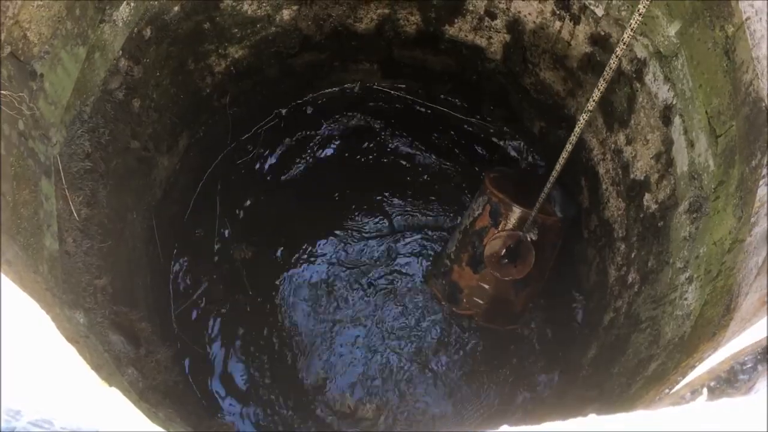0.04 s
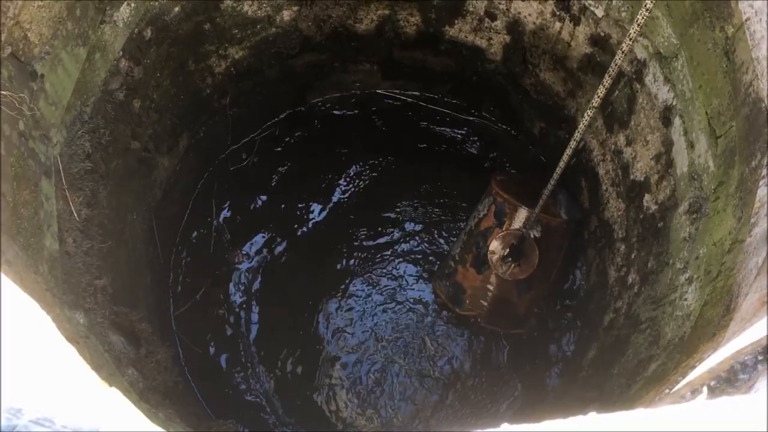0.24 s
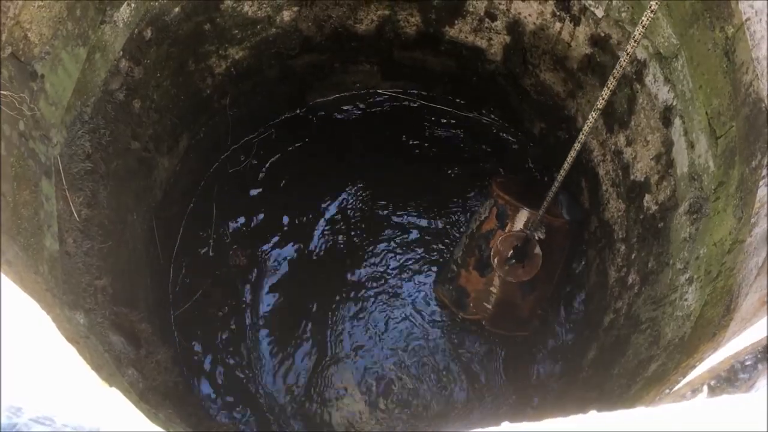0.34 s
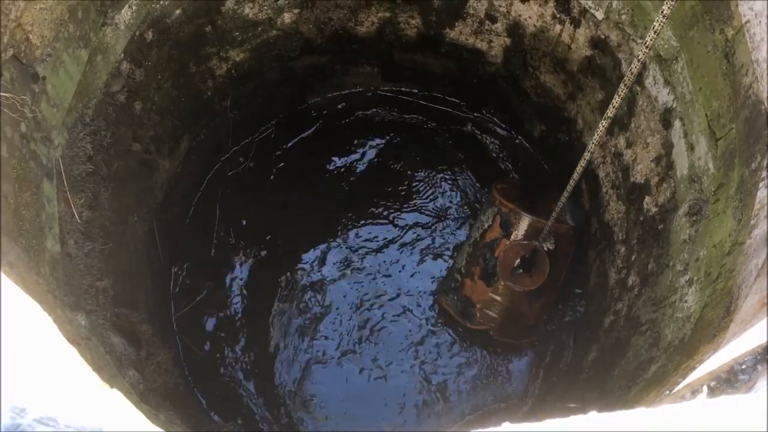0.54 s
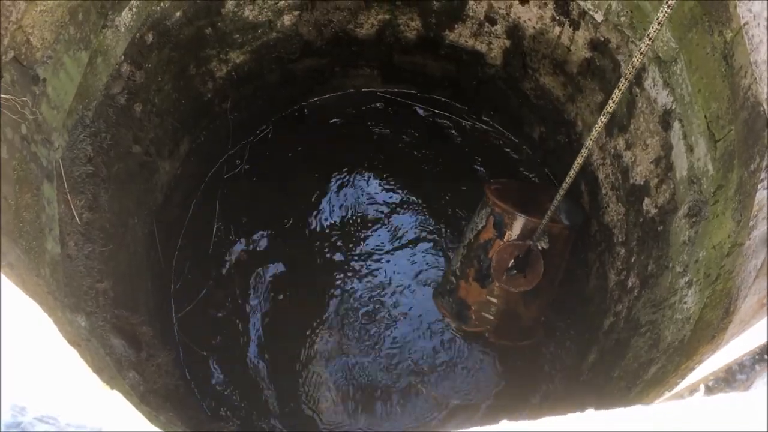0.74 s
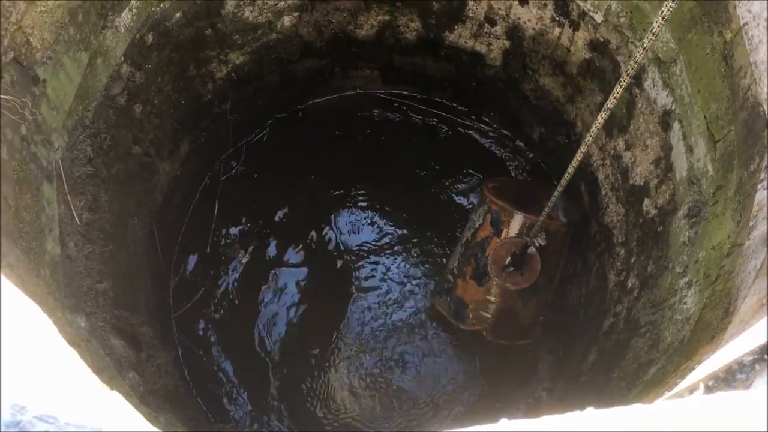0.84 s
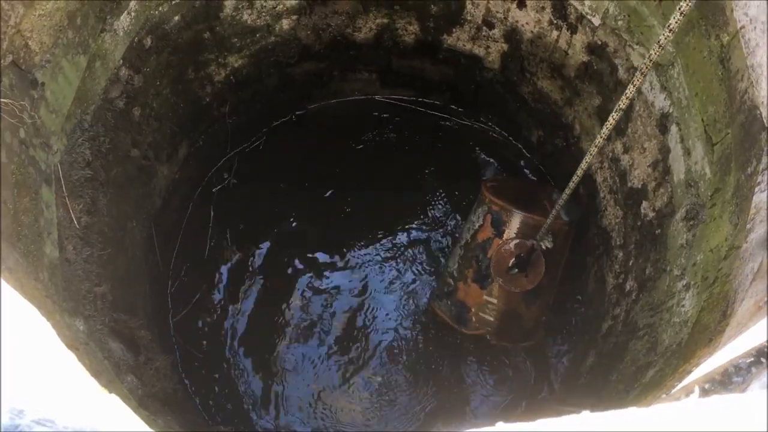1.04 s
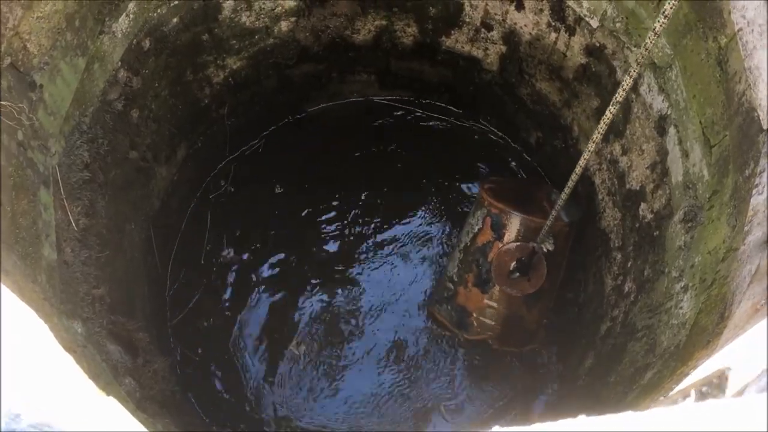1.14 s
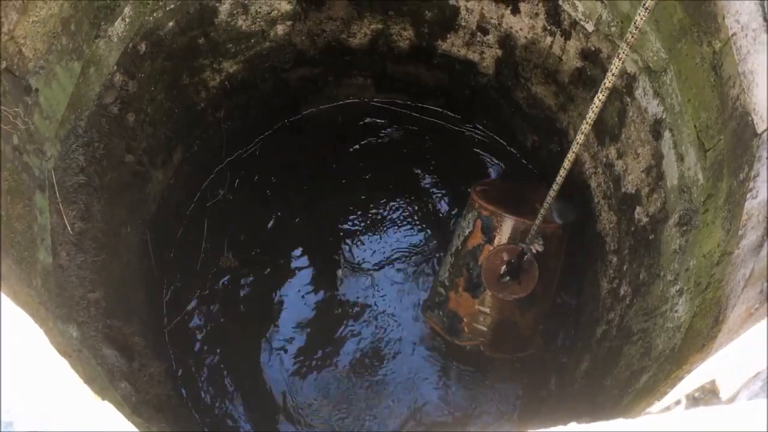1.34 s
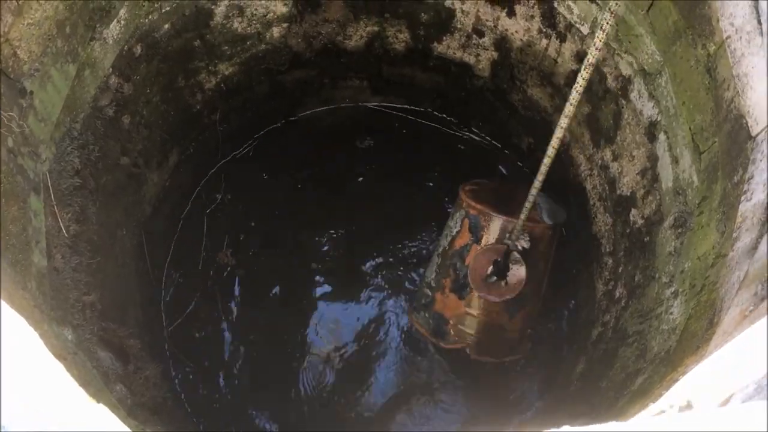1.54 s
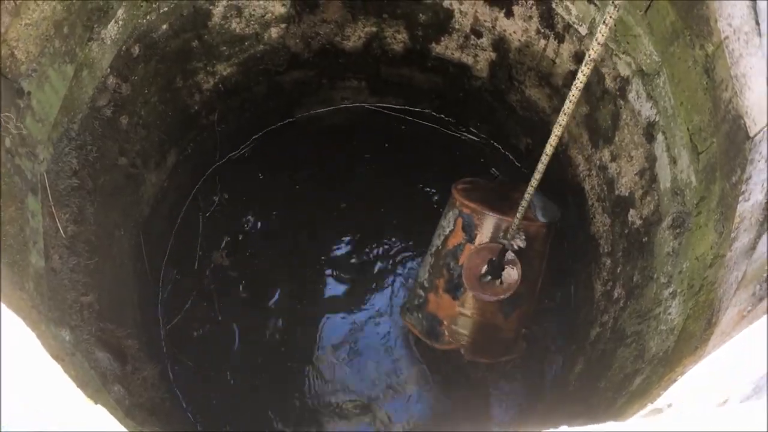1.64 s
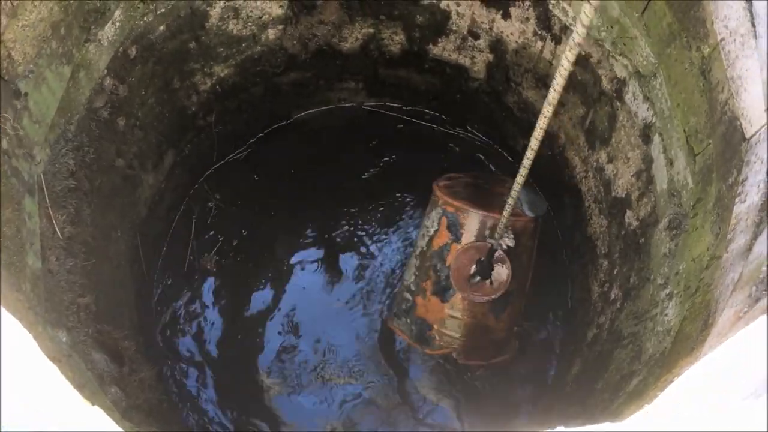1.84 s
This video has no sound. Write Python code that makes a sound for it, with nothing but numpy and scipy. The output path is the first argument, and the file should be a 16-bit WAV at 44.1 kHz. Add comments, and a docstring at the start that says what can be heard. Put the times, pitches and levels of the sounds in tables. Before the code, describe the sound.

A metal pump thuds once against a well wall, over low rumble and faint drips.

```python
"""A soft outdoor hush lies over a stone well, where stirred water ripples and splashes faintly.
Almost at once, turbulent puffs of air begin to rumble on the microphone. At 0.29 s a metal pump
hanging on a rope bumps the wall: a short gritty contact, then a dull boom as the modes of the
shaft ring and decay. From 0.7 s drips fall, each a resonating bubble that echoes off the stone,
while the lapping and the puffs go on."""
import sys
import numpy as np
from scipy import signal
from scipy.io import wavfile
from scipy.ndimage import uniform_filter1d

SR = 44100
rng = np.random.default_rng(int(sys.argv[2]) if len(sys.argv) > 2 else 0)


def store_pcm(level_fs):
    """Save levels as 16-bit WAV."""
    pcm = np.round(np.clip(level_fs, -1, 1) * 32767).astype(np.int16)
    wavfile.write(sys.argv[1], SR, np.atleast_2d(pcm).T)


N = 83790
TIME = np.arange(N) / SR

# outdoor hush: frequency_hz, half_octave_level_db
HUSH_SPECTRUM = [(300, -74), (600, -67), (830, -63), (1120, -52), (1550, -53), (1850, -58.5), (2300, -70.5),
                 (3200, -76), (6000, -93)]
# its slow swell: time_s, gain_db
HUSH_SWELL = [(0, 1.5), (.25, 0), (.5, -2), (.8, -3.5), (1.0, -1), (1.35, 2), (1.7, 4.5), (1.9, 4.5)]
# air in the shaft: frequency_hz, half_octave_level_db
SHAFT_AIR_SPECTRUM = [(100, -57), (210, -64.5), (300, -65), (410, -65.5), (600, -66), (900, -67.5)]
# hiss of rippling water: frequency_hz, half_octave_level_db
RIPPLE_SPECTRUM = [(1800, -61), (2800, -67.5), (4000, -66), (5800, -65.5), (7500, -66), (9000, -63),
                   (10400, -67), (12000, -66.5), (15500, -69)]
# its slow swell: time_s, gain_db
RIPPLE_SWELL = [(0, 1), (.12, -1), (.25, -2.5), (.5, -5.5), (.65, -8.5), (.83, -5.5), (.93, -5),
                (1.02, -3.5), (1.17, 2), (1.33, 3.5), (1.47, 0), (1.59, -4), (1.73, 2), (1.9, 1.5)]
# small splashes: start_s, level_db, centre_hz, t60_s
SPLASH_BURSTS = [(.005, -55.5, 3330, 0.1), (.473, -56.5, 9000, 0.025), (.495, -60, 13400, 0.045),
                 (0.894, -58, 7940, 0.11), (0.965, -54, 11400, .04), (1.146, -47, 4300, 0.11),
                 (1.146, -51, 9300, 0.18), (1.187, -49.5, 9000, 0.11), (1.27, -52, 12000, 0.083),
                 (1.465, -54, 2000, 0.1), (1.633, -53, 13000, .05), (1.71, -52.5, 10500, 0.12),
                 (1.818, -43, 8800, 0.13), (1.821, -51.5, 4340, .15)]
# puffs of air: start_s, length_s, level_db
AIR_PUFFS = [(0.017, 0.098, -40), (0.159, 0.11, -28.5), (0.308, 0.065, -38.5), (0.493, 0.059, -42.5),
             (0.631, 0.028, -35), (0.672, 0.031, -34), (0.95, 0.051, -40.5), (1.138, 0.12, -37.5),
             (1.353, 0.027, -33.5), (1.422, 0.042, -32), (1.48, 0.042, -31), (1.563, 0.073, -36),
             (1.653, 0.059, -43.5), (1.755, 0.17, -46)]
# spectral shape of their rumble: frequency_hz, relative_half_octave_level_db
RUMBLE_SPECTRUM = [(25, -30), (42, -1.5), (62, 1), (100, -0.5), (160, -6.5), (240, -19), (400, -32.5),
                   (800, -54)]
# low thumps among the puffs: start_s, level_db, pitch_hz, t60_s
AIR_THUMPS = [(0.184, -24.5, 198, 0.037), (0.239, -18.5, 45.3, 0.14), (1.436, -25.5, 202, 0.066),
              (1.511, -14, 157, 0.025)]
# the pump's touch and rebound: delay_s, gain_db
PUMP_TOUCHES = [(.0015, 0.5), (0.0134, -12.5)]
# modes of the metal: pitch_hz, level_db, t60_s
METAL_MODES = [(1032, -25.5, 0.026), (1540, -26.5, 0.026), (1975, -26.5, .02), (4200, -40, 0.026)]
# modes that ring in the shaft: pitch_hz, level_db, t60_s
SHAFT_MODES = [(155, -18, 0.18), (168.55, -9.5, 0.43), (208.1, -16, 0.47), (213, -50.5, 3.6),
               (254.7, -22.5, 0.41), (283, -18.5, .3), (342, -26.5, 0.34), (382.6, -28, 0.48),
               (411, -25.5, 0.47), (399, -50, 2.2), (505.4, -27, 0.14), (567.3, -26.5, 0.26),
               (590, -29, 0.19), (673.5, -37.5, 0.41), (725, -45.5, 0.5), (1080, -35.5, 0.28)]
# dense reflections off the stone: frequency_hz, half_octave_level_db, t60_s
REFLECTIONS = [(150, -34, 0.44), (298, -29, .33), (624, -36.5, 0.38), (795, -37, 0.39), (950, -30, 0.17),
               (1620, -33.5, 0.19), (2550, -44.5, 0.17), (3850, -40.5, 0.23), (8000, -43, 0.15),
               (14000, -47, 0.1)]
# bubbles made by drips: start_s, direct_level_db, starting_pitch_hz
DRIP_BUBBLES = [(0.716, -49, 5050), (1.033, -46, 2350), (1.09, -36, 1744), (1.128, -40, 5200),
                (1.146, -36, 3415), (1.148, -41, 3980), (1.263, -36, 5400), (1.31, -42, 2980),
                (1.312, -42, 2700), (1.358, -41, 5100), (1.464, -40.5, 2080), (1.674, -49, 2890),
                (1.76, -40.5, 2450), (1.832, -35, 1125), (1.891, -36, 4150)]

KNOCK_S, REFLECTION_ATTACK_S = 0.2903, 0.0015


def from_db(db):
    """Amplitude grows tenfold for every 20 dB."""
    return 10 ** (np.asarray(db) / 20)


def unit_rms(x):
    """Division by the root mean square gives unit power."""
    return x / np.sqrt(np.mean(x ** 2) + 1e-20)


def at_hz(table, hz, column=1):
    """A table's column is interpolated along log frequency."""
    table = np.array(table)
    return np.interp(np.log(hz), np.log(table[:, 0]), table[:, column])


def since(start_s):
    """Elapsed seconds, zero before the start."""
    return np.maximum(TIME - start_s, 0)


def decay(start_s, t60_s, attack_s):
    """Exponential damping: after a quick rise, the level falls 60 dB in t60_s."""
    age = since(start_s)
    return (1 - np.exp(-age / attack_s)) * np.exp(-np.log(1000) * age / t60_s)


def ring(start_s, db, hz, t60_s, attack_s):
    """A struck mode vibrates freely as a damped sinusoid."""
    return from_db(db) * decay(start_s, t60_s, attack_s) * np.sin(2 * np.pi * hz * since(start_s))


def band_noise(low_hz, high_hz):
    """Band-pass filtering confines white noise to one band, at unit power."""
    sos = signal.butter(2, [low_hz, min(high_hz, .45 * SR)], "band", fs=SR, output="sos")
    white = rng.standard_normal(N + SR // 4)
    return unit_rms(signal.sosfilt(sos, signal.sosfilt(sos, white))[-N:])


def bands(spectrum):
    """Noise powers add: yield (centre_hz, noise) per quarter octave, at half the half-octave power."""
    edges = 20 * 2 ** np.arange(0, 9.8, .25)
    for low, high in zip(edges, edges[1:]):
        hz = np.sqrt(low * high)
        if high > spectrum[0][0] and low < spectrum[-1][0]:
            yield hz, from_db(at_hz(spectrum, hz)) * band_noise(low, high) / np.sqrt(2)


def drift(knots_per_s):
    """Interpolation between random values gives a slow wander of unit power."""
    knots = rng.standard_normal(int(knots_per_s * N / SR) + 2)
    return unit_rms(np.interp(TIME * knots_per_s, np.arange(len(knots)), knots))


def swelling_noise(spectrum, swell, flicker_db):
    """Amplitude modulation: the bands swell together and flicker independently."""
    gain = from_db(np.interp(TIME, *np.transpose(swell)))
    return gain * sum(noise * from_db(flicker_db * drift(knots_per_s=25)) for _, noise in bands(spectrum))


def ambient_air():
    """Incoherent noises superpose: the outdoor hush and the steady low noise of air in the shaft."""
    hush = swelling_noise(HUSH_SPECTRUM, HUSH_SWELL, flicker_db=1.0)
    return hush + sum(noise for _, noise in bands(SHAFT_AIR_SPECTRUM))


def ripples():
    """Rippling water radiates broadband noise, a fine hiss that ebbs and swells."""
    return swelling_noise(RIPPLE_SPECTRUM, RIPPLE_SWELL, flicker_db=0.5)


def splashes():
    """Wavelets breaking on the pump and the wall radiate short, decaying bursts of bright noise."""
    edge_ratio = 1.51
    return sum(from_db(db) * decay(start_s, t60_s, attack_s=0.00067)
               * band_noise(hz / edge_ratio, hz * edge_ratio) for start_s, db, hz, t60_s in SPLASH_BURSTS)


def air_puffs():
    """Turbulent pressure on the microphone rumbles and thumps; stronger puffs are brighter."""
    attack_s, release_s, even_s = 0.013, 0.0087, 0.0248
    still_db, full_puff_db = -49, -32
    knee_hz, dulling_per_octave = 114, 0.27
    pressure = from_db(still_db)
    for start_s, length_s, db in AIR_PUFFS:
        rise = np.minimum(since(start_s) / attack_s, 1)
        fall = np.exp(-since(start_s + length_s) / release_s)
        pressure = pressure + from_db(db) * rise * fall
    strength = pressure / from_db(full_puff_db)
    rumble = sum(noise * strength ** (dulling_per_octave * max(np.log2(hz / knee_hz), 0))
                 for hz, noise in bands(RUMBLE_SPECTRUM))
    # even out the short-term power, so that the pressure envelope sets the level
    rumble /= np.sqrt(uniform_filter1d(rumble ** 2, int(even_s * SR)) + 1e-12)
    return rumble * pressure + sum(ring(*thump, attack_s=0.00082) for thump in AIR_THUMPS)


def pump_clack():
    """Impact on stone excites the metal's heavily damped modes, at the touch and at the rebound."""
    return sum(ring(KNOCK_S + delay_s, db + gain_db, hz, t60_s, attack_s=0.00027)
               for delay_s, gain_db in PUMP_TOUCHES for hz, db, t60_s in METAL_MODES)


def shaft_boom():
    """Resonance: just after the impact, the shaft rings at its natural frequencies."""
    delay_s, low_cut_hz = 0.00284, 129
    boom = sum(ring(KNOCK_S + delay_s, db, hz, t60_s, attack_s=0.0016) for hz, db, t60_s in SHAFT_MODES)
    return signal.sosfilt(signal.butter(5, low_cut_hz, "high", fs=SR, output="sos"), boom)


def stone_reflections():
    """Reverberation: the knock's reflections merge into decaying noise; low bands build up later."""
    build_cycles = 2.8
    return sum(noise * decay(KNOCK_S, at_hz(REFLECTIONS, hz, column=2),
                             attack_s=REFLECTION_ATTACK_S + build_cycles / hz)
               for hz, noise in bands(REFLECTIONS))


def drips():
    """Bubble resonance: each drip rings, rising a little in pitch, and reverberates in the shaft."""
    ring_cycles, pitch_rise, echo_gain = 70, 0.07, 1.65
    direct = 0
    for start_s, db, hz in DRIP_BUBBLES:
        t60_s = ring_cycles / hz
        pitch_hz = hz * (1 + pitch_rise * np.minimum(since(start_s) / t60_s, 1))
        phase = 2 * np.pi * np.cumsum(pitch_hz) / SR
        direct = direct + from_db(db) * decay(start_s, t60_s, attack_s=0.0023) * np.sin(phase)
    shaft_response = rng.standard_normal(N) * decay(0, t60_s=0.14, attack_s=REFLECTION_ATTACK_S)
    shaft_response /= np.linalg.norm(shaft_response)
    return direct + echo_gain * signal.fftconvolve(direct, shaft_response)[:N]


def scene():
    """Superposition: water, air and knock add at the rim of the well."""
    water = drips() + splashes() + ripples()
    background = ambient_air()
    knock = pump_clack() + shaft_boom() + stone_reflections()
    return (background + water + air_puffs() + knock)[None]


def record(dry):
    """Band limiting: a steep low-pass filter removes the highest treble."""
    cutoff_hz = 15800
    return signal.sosfilt(signal.ellip(12, .1, 90, cutoff_hz, fs=SR, output="sos"), dry)


dry = scene()
out = record(dry)
store_pcm(out)
```